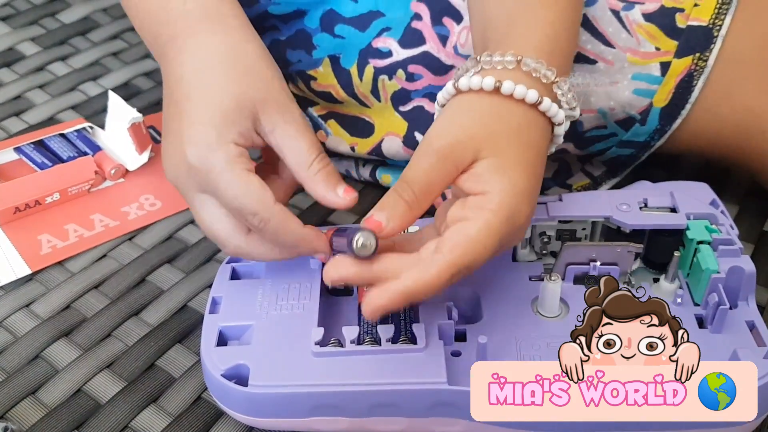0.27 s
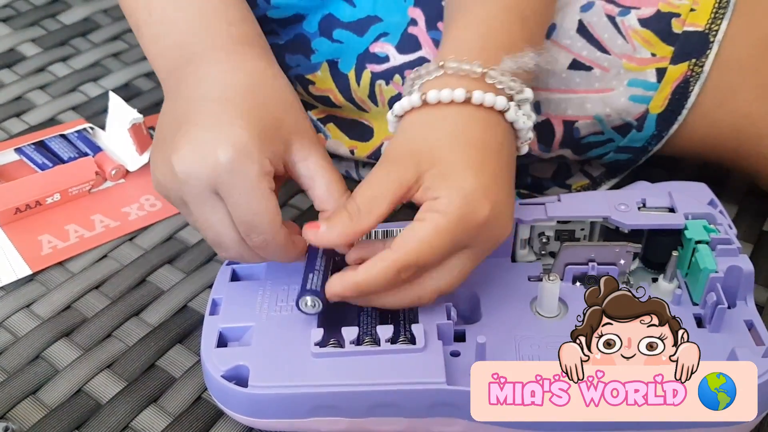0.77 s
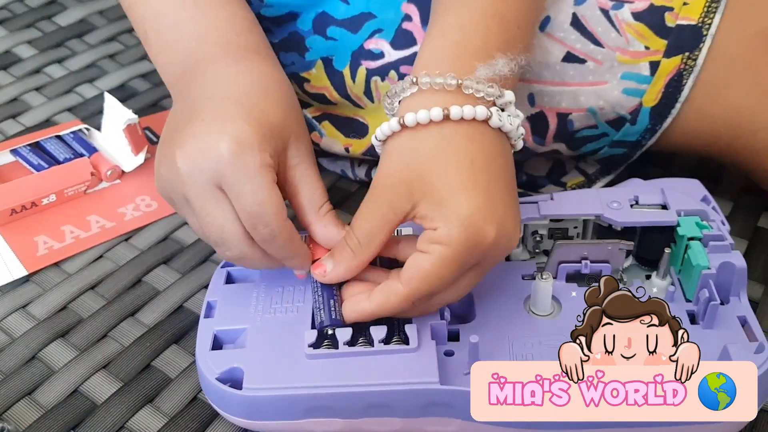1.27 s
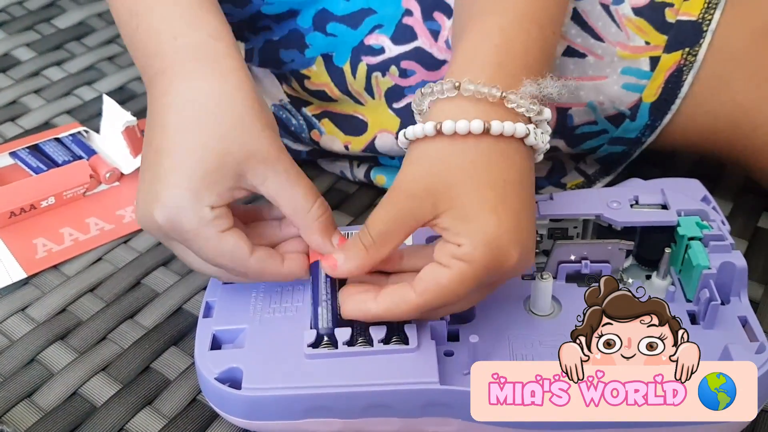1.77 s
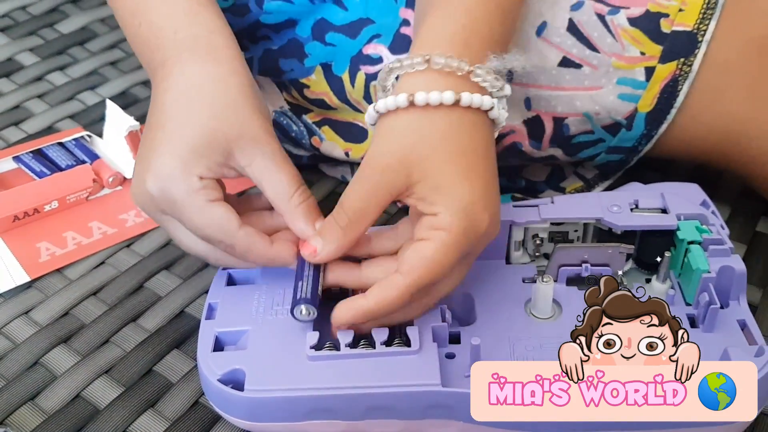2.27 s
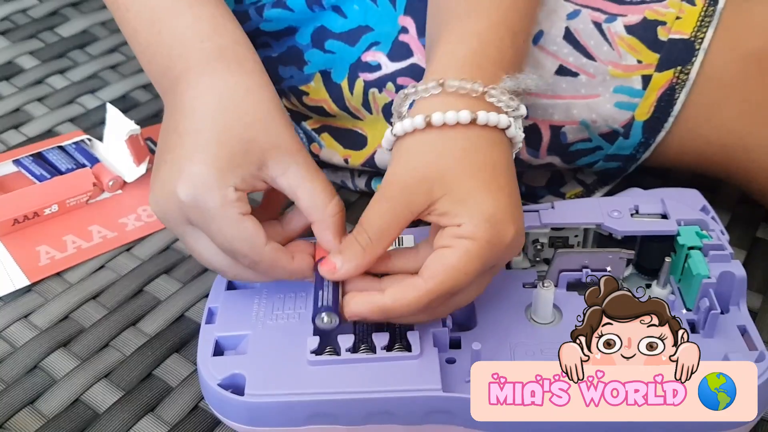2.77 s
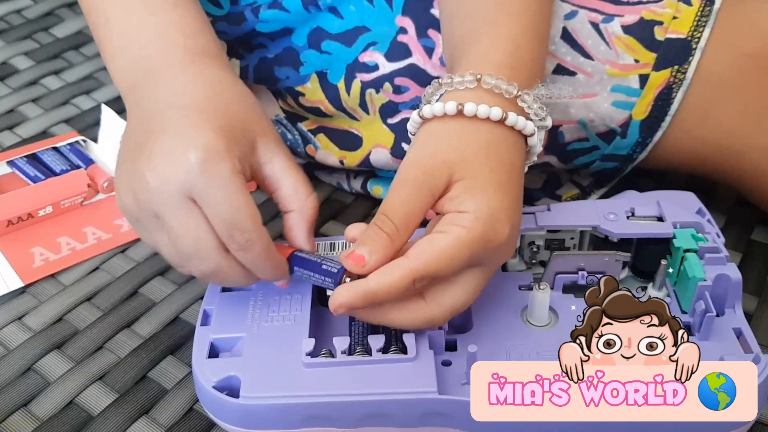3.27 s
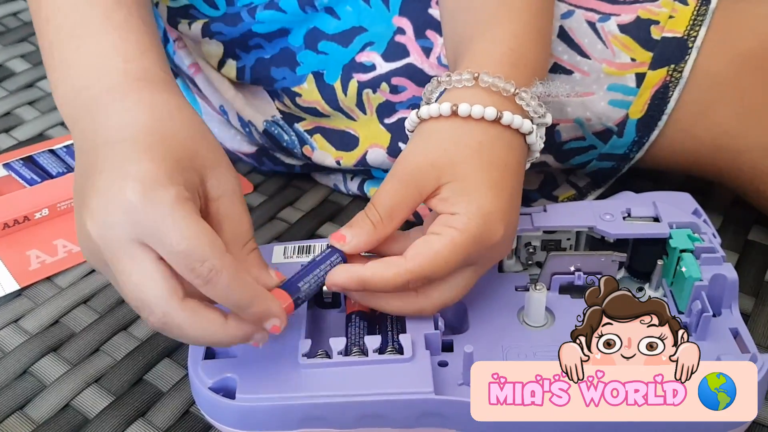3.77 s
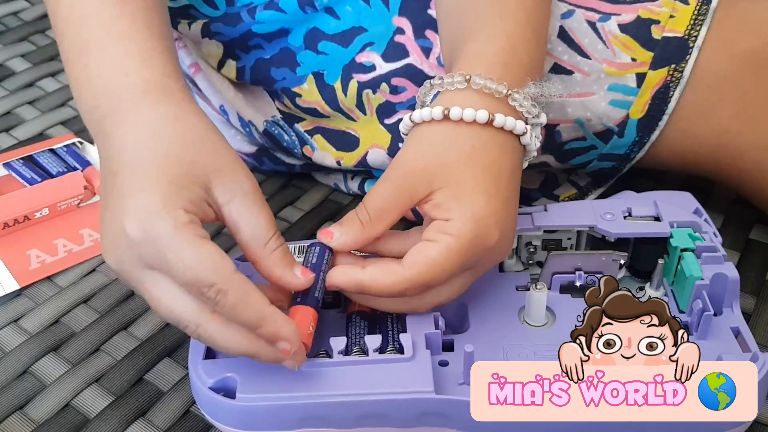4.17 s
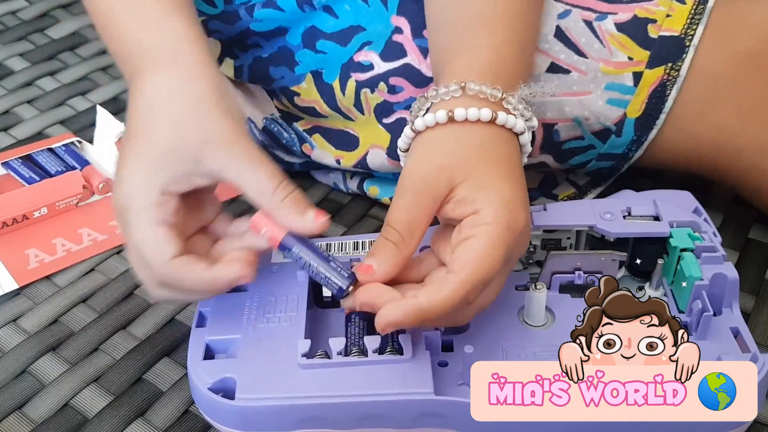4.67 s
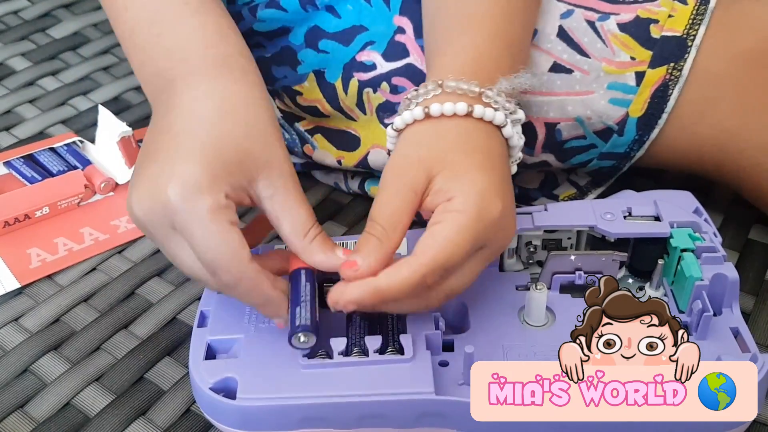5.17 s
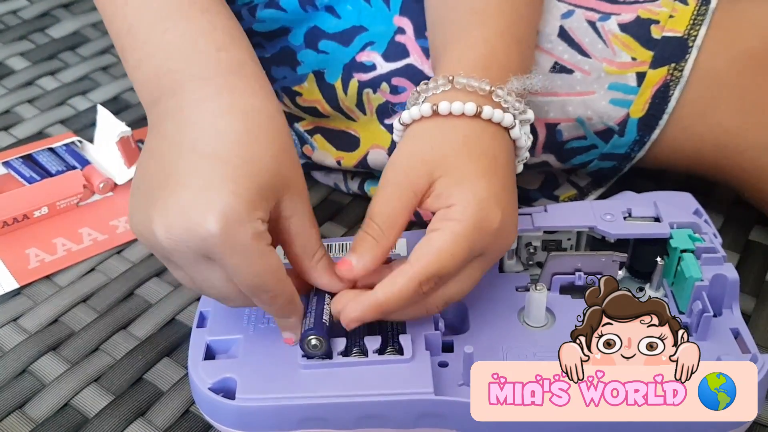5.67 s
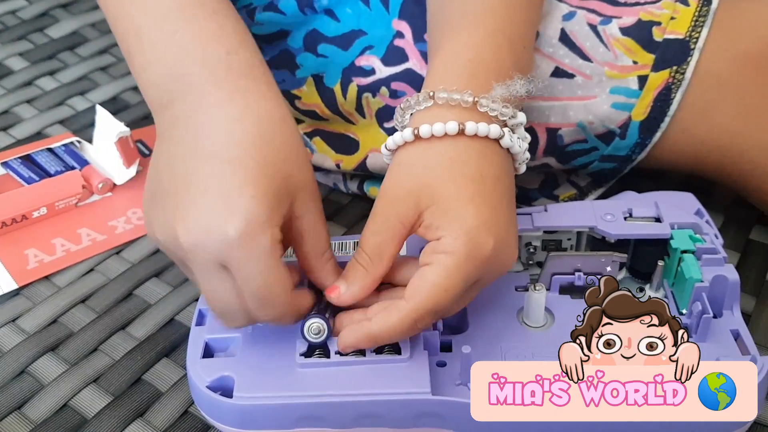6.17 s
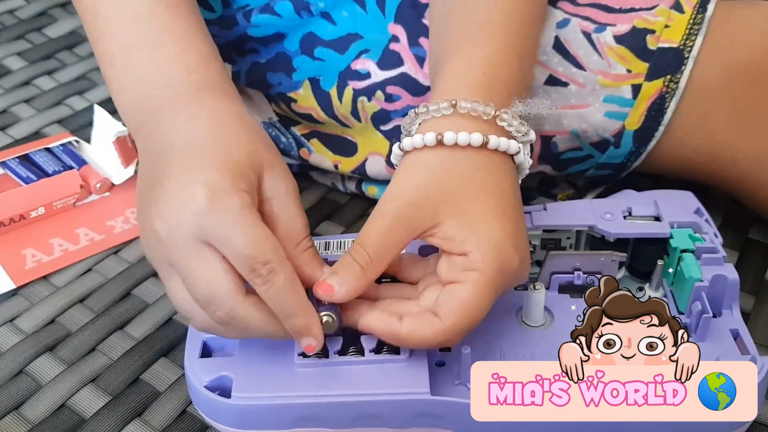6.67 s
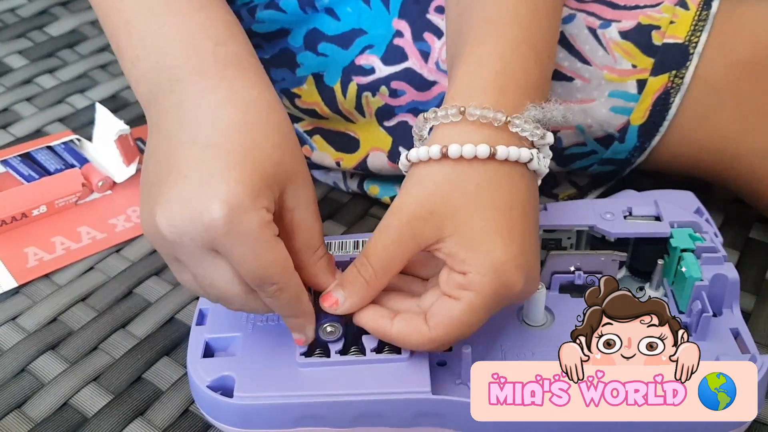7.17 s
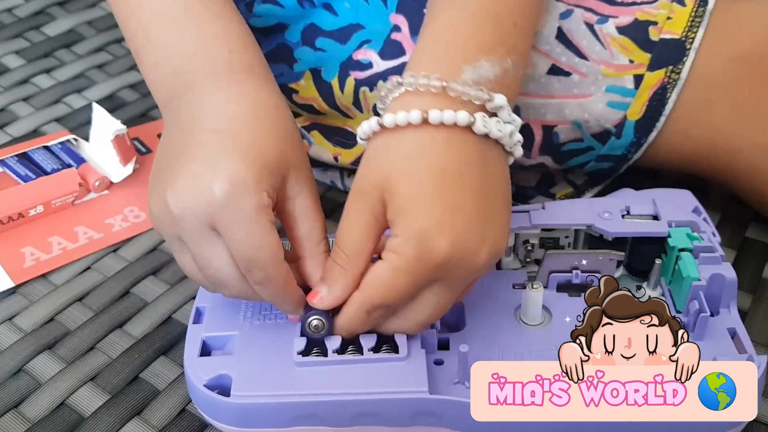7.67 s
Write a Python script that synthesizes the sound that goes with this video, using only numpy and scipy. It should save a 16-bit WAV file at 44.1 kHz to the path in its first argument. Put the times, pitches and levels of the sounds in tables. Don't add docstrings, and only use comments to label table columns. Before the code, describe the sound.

Close up, fingers work a small battery into the spring-loaded bay of a hollow plastic toy. Faint rubs and a tiny squeak come first, then a hard snap and a louder cluster of snaps. After a near-quiet gap, knocks resume, the battery slips loose in a rapid clatter and snaps home, followed by pressing clicks. Low distant rumble and slight hiss lie beneath, with a short room echo.

```python
import sys
import numpy as np
from scipy import signal
from scipy.io import wavfile
from scipy.ndimage import uniform_filter1d

SR = 44100
rng = np.random.default_rng(int(sys.argv[2]) if len(sys.argv) > 2 else 0)


def master(y):
    cut = np.clip(np.atleast_2d(y).T, -1, 1)
    pcm = np.round(cut * 32767)
    wavfile.write(sys.argv[1], SR, pcm.astype(np.int16))


def convert_level_to_amplitude(level_db):
    exponent = np.asarray(level_db, float) / 20
    return 10 ** exponent


N = 349708

# f/Hz, left level/dB, right level/dB, t60/ms
HOLLOW_MODES = [(310, -17, -16, 55), (515, -9.5, -13, 31), (730, -6, -6, 26), (895, 0, -1.5, 18),
                (1130, -4, -8, 20)]
PANEL_MODES = [(1250, -8, -20, 8), (1560, -5, -14, 15), (1830, -1, -14, 12), (2200, -5, -6, 8),
               (2420, -8, -14, 9), (2780, -3, -18, 11), (3200, -8, -15, 6)]
EDGE_MODES = [(3520, 2, -12, 4.4), (4760, -3.5, -14.5, 7.7), (5140, -3.5, -14.5, 9.3),
              (5560, -15, -14.5, 5.7), (7370, -28.5, -7, 3.4)]
TICK_MODES = [(8280, -12, -8.5, 4), (10040, -4, -5, 4), (10960, 0, -0.5, 4.5), (11900, -1, 2, 4),
              (13100, -3, -3, 3), (14500, -5, -6, 2.5)]
# low f/Hz, high f/Hz
RADIATED_BANDS = [(250, 1350), (1050, 3600), (3000, 7800), (7400, 16000)]


def rms_one(x):
    return x / np.sqrt(np.mean(x ** 2) + 1e-20)


def in_time(rows):
    s, *columns = np.transpose(rows)
    return [np.interp(np.arange(N) / SR, s, c) for c in columns]


def at_hz(points, hz):
    point_hz, value = np.array(points).T
    return np.interp(np.log(hz), np.log(point_hz), value)


def left_right(left, right):
    return np.array([[left], [right]])


def band_pass(x, order, band):
    return signal.sosfilt(signal.butter(order, band, "band", fs=SR, output="sos"), x)


def drift(rate):
    pole = np.exp(-80 * np.pi * rate / SR)
    white = rng.standard_normal(N // 40 + 2002)
    slow = signal.lfilter([1], [1, -2 * pole, pole * pole], white)[2000:]
    return np.interp(np.arange(N) / 40, np.arange(len(slow)), rms_one(slow))


def ring(force, hz, t60_ms):
    r = convert_level_to_amplitude(-60000 / (max(t60_ms, 1) * SR))
    w = 2 * np.pi * hz / SR
    return signal.lfilter([0, np.sin(w)], [1, -2 * r * np.cos(w), r * r], force + 1e-18)


def whistle(noise, hz, width_hz):
    t60_ms = 2200 / max(width_hz, .5)
    return rms_one(ring(ring(noise, hz, t60_ms), hz, t60_ms))


def pair(hz, noise):
    # f/Hz, likeness from -1 to 1
    likeness = [(60, 0.91), (180, 0.99), (550, 0.18), (1650, 0.18), (4970, 0.1), (15000, -0.18)]
    alike = np.clip(at_hz(likeness, hz), -1, 1)
    shared = np.sqrt(1 + alike) * noise[0]
    opposed = np.sqrt(1 - alike) * noise[1] * left_right(1, -1)
    return (shared + opposed) / np.sqrt(2)


def banded_noise(spectrum, low_hz, octaves, patchy_db):
    # f/Hz, left-right level/dB
    lean = [(60, -0.5), (180, -1), (550, 0.5), (1650, -1), (4970, 1.5), (15000, 1)]
    out = 0
    edges = np.minimum(low_hz * 2 ** np.arange(0, octaves, 1 / 3), .45 * SR)
    white = rng.standard_normal((2, 2, N))
    for k, (low, high) in enumerate(zip(edges, edges[1:])):
        hz = np.sqrt(low * high)
        band = pair(hz, band_pass(white[k % 2], 2, [low, high]))
        lean_db = at_hz(lean, hz) / 2 * left_right(1, -1)
        out = out + convert_level_to_amplitude(at_hz(spectrum, hz) + lean_db) * convert_level_to_amplitude(patchy_db * drift(5.6)) * band
    return rms_one(out)


def background():
    # t/s, level/dB
    deep_load = [(0.0, -61), (0.02, -55), (0.84, -61), (1.48, -50.5), (1.57, -63.5), (1.81, -53),
                 (2.05, -68), (2.07, -55.5), (2.65, -53), (3.86, -63), (4.09, -54.5), (6.8, -53.5),
                 (6.89, -51.5), (7.18, -52.5), (7.64, -49), (7.71, -72), (7.8, -44.5), (7.93, -58.5)]
    # t/s, level/dB
    motor_load = [(0.0, -65.5), (0.09, -56), (0.79, -59), (1.02, -63.5), (1.52, -56), (1.57, -61),
                  (6.03, -61), (6.05, -52), (6.82, -66), (7.46, -54), (7.51, -71), (7.93, -69.5)]
    # f/Hz, density level/dB
    deep_spectrum = [(13, -42), (22, -20), (31, -15.5), (43, 6), (75, -1.5), (85, -9.5), (110, -33),
                     (190, -120)]
    # f/Hz, density level/dB
    air_spectrum = [(71, -30), (120, 2.5), (153, -13), (200, -8.5), (341, -11.5), (535, -26.5), (874, -31),
                    (949, -32.5), (3450, -39), (4980, -34), (8480, -51.5), (9990, -43), (12000, -28),
                    (15000, -28.5), (16000, -53.5)]
    # f/Hz, level/dB, left-right level/dB, wobble/dB
    hum_lines = [(98.75, -64, 4.5, 4.5), (152.7, -78.5, -8.4, 3.5), (202, -67.5, -7.5, 1),
                 (265, -78, -1.5, 0), (332, -73.5, 2, -1), (464, -85, -9, 3.5), (712, -94.5, 2, 5.5),
                 (869, -91, 14, 2)]
    # f/Hz, width/Hz, level/dB, left-right level/dB
    port_peaks = [(2440, 1100, -83, 7.5), (4910, 500, -89, 7.5)]
    (deep_db,), (upper_db,) = in_time(deep_load), in_time(motor_load)
    out = convert_level_to_amplitude(deep_db) * banded_noise(deep_spectrum, low_hz=22.7, octaves=2.1, patchy_db=3.0)
    upper = band_pass(rng.standard_normal((2, N)), 2, [82, 132])
    out += convert_level_to_amplitude(upper_db - 4.5) * rms_one(pair(100, upper))
    out += convert_level_to_amplitude(-61 - 3.5) * banded_noise(air_spectrum, low_hz=123.85, octaves=7.4, patchy_db=-1.04)
    for hz, level_db, lean_db, wobble_db in hum_lines:
        turn = 2 * np.pi * hz * np.arange(N) / SR + 0.26 * drift(0.51)
        swell_db = wobble_db * drift(7.9) + (upper_db - np.mean(upper_db)) * (hz < 120)
        out += convert_level_to_amplitude(level_db + 2.5 + swell_db + lean_db / 2 * left_right(1, -1)) * np.sin(turn)
    for hz, width_hz, level_db, lean_db in port_peaks:
        hiss = whistle(rng.standard_normal((2, N)), hz, width_hz)
        out += convert_level_to_amplitude(level_db + lean_db / 2 * left_right(1, -1)) * hiss
    return signal.sosfilt(signal.cheby2(12, 40, 15750, fs=SR, output="sos"), out)


def contacts():
    # t/s, peak level/dB, hollow thud level/dB, bright edge level/dB
    knocks = [(0.473, -32.5, -15.5, -17.5), (1.803, -32, -17, -17.5), (2.129, -46, -13, -11),
              (5.082, -49, -30, -7), (5.09, -47, -18, -29), (5.12, -32.5, -36, -20), (5.132, -42, -35, -16),
              (5.183, -39.5, -23, -17), (5.323, -34.5, -9.5, -18), (5.45, -47.5, -25, -16),
              (5.831, -46, -13.5, -17), (6.357, -46, -24, -13.5), (6.378, -43.5, -34, -20),
              (6.433, -50.5, -28, -13), (6.891, -54, -3, -11), (7.339, -33, -14, -32),
              (7.262, -38.5, -22, -11), (7.317, -44.5, -27, -13), (7.335, -23, -31, -15.5),
              (7.386, -27.5, -29, -16), (7.752, -32.5, -10, -16.5), (7.92, -31.5, -14, -16.5)]
    # t/s, peak level/dB, thud level/dB, edge level/dB
    snaps = [
        (1.382, -16, -23, -18),
        (2.329, -9.5, -37, -18),
        (2.345, -14, -25, -22),
        (2.391, -22.5, -14.5, -17.5),
        (2.477, -23, -22, -24.5),
        (5.068, -33.5, -41, -16),
        (5.533, -31.5, -53, -33.5),
        (5.9, -13, -17, -18.5),
        (6.216, -15.5, -29.5, -38),
    ]
    # t/s, peak level/dB, thud level/dB, edge level/dB, chatter/ms
    clatter = [(5.869, -34.5, -9.5, -18, 4.25), (5.925, -20.5, -22, -23, 3.2), (5.94, -26, -20, -28, 3.2),
               (5.946, -13.5, -45.5, -20, 3), (5.953, -26.5, -18, -18, 4.5), (5.956, -23, -45, -14.5, 2.8),
               (5.972, -34.5, -42, -3.5, 3.5), (5.977, -21.5, -30, -18.5, 2.7),
               (5.986, -18.5, -22, -20, 3.2), (6, -29, -4.5, -24, 3), (6.006, -30.5, -14, -37.5, 4),
               (6.014, -38.5, -2, -14, 4), (6.026, -40, -5.5, -2.5, 3.1), (6.039, -33, -17.5, -21, 3.5),
               (6.058, -40.5, -4, -2.5, 3.3), (6.197, -37.5, -25, -8.5, 8.9), (6.209, -33.5, -31, 1.5, 2.6),
               (6.231, -33.5, -9.5, -12, 2.25)]
    # t/s, peak level/dB, edge level/dB, metal tick level/dB
    metal_contacts = [(1.049, -62, 7, -34.5), (1.403, -36, -3, -15.5), (1.657, -53.5, -4, -15),
                      (1.723, -45.5, 3.5, -18.5), (1.744, -44.5, 5.5, -14), (1.912, -60.5, 1.5, -24),
                      (2.034, -55.5, 1.5, -20), (2.092, -46, 3, -15), (2.159, -52, -2, -23),
                      (6.094, -29.5, 3, -13.5), (6.243, -36.5, -2, -14.5), (7.688, -72.5, 20.5, -8)]
    # t/s, peak level/dB, hollow thud level/dB
    taps = [(0.169, -56.5, -9), (0.934, -71, 1), (1.018, -57.5, -12), (1.246, -71, -7), (2.761, -60.5, -20),
            (3.057, -67.5, 11.5), (3.358, -56, -16), (5.25, -64, -18), (5.747, -57.5, -8.5),
            (5.8, -53.5, -19.5), (6.419, -58.5, -13), (6.711, -62, -7.5), (7.124, -57, -25)]
    rows = [(s, peak, thud, edge, -33, 4.5) for s, peak, thud, edge in knocks]
    rows += [(s, peak, thud, edge, -37, 2.98) for s, peak, thud, edge in snaps]
    rows += [(s, peak, thud, edge, -28, ms) for s, peak, thud, edge, ms in clatter]
    rows += [(s, peak, -24, edge, tick, 2.9) for s, peak, edge, tick in metal_contacts]
    rows += [(s, peak, thud, -7.5, -45.5, 3.77) for s, peak, thud in taps]
    s, peak_db, thud_db, edge_db, tick_db, chatter_ms = np.transpose(sorted(rows))
    tick_db = tick_db + 0.48 * (edge_db + 12)
    return s, peak_db, thud_db, edge_db, tick_db, chatter_ms


def grip(s):
    # t/s, f/Hz, level/dB re the blow's peak
    grips = [(0.17, 1910, 8), (0.473, 2090, 3.5), (1.019, 2280, 10), (1.382, 1600, 3), (1.723, 2800, 4),
             (1.803, 970, -9), (2.129, 1700, -2), (2.329, 1810, -4.5), (2.345, 1810, -5),
             (2.391, 2300, 4.5), (2.477, 2040, -0.5), (2.761, 1650, 8.5), (5.02, 2690, 0),
             (5.068, 1570, -2), (5.12, 2630, 0), (5.132, 1130, 7), (5.184, 1690, 4.5), (5.324, 1860, -2),
             (5.533, 1564, -3.5), (5.8, 1110, 0.5), (5.87, 1035, 1), (5.9, 1554, 5.5), (5.925, 1560, 0.5),
             (5.941, 1590, -1.5), (5.945, 1560, -0.5), (5.957, 1597, 6), (5.976, 1560, 2.5),
             (5.987, 1560, 3.5), (6.0, 1510, 3), (6.006, 1520, -2), (6.041, 1170, 5.5), (6.216, 1760, -3.5),
             (6.232, 1120, 5), (6.378, 2230, 2.5), (6.892, 1108, -9), (7.263, 2050, 5.5),
             (7.318, 2190, 3.5), (7.335, 1610, 3.5), (7.339, 1260, 3.5), (7.387, 2570, 4.5),
             (7.753, 947, -2), (7.92, 2030, 7)]
    at, hz, note_db = np.transpose(grips)
    nearest = np.abs(s[:, None] - at).argmin(axis=1)
    held = np.abs(s - at[nearest]) < .007
    return hz[nearest], np.where(held, note_db[nearest], -40), held


def impact_force(age, chatter_ms):
    length_ms = np.clip(chatter_ms, 1.2, 20)
    luck = rng.random((len(chatter_ms), 3, len(age)))
    struck = luck[:, 0] < 4000 / SR
    bounce = struck * -np.log(1 - luck[:, 1]) * np.sign(luck[:, 2] - .5)
    spent = 1000 * age / length_ms[:, None]
    force = .3 * bounce * np.sqrt(spent) * np.exp(-spent)
    force[:, 0] = (2.7 / length_ms) ** 3
    return force


def clicks():
    # f/Hz, left level/dB, right level/dB, t60/ms
    cracks = [
        [],
        [(2500, 11, -3, 2.2)],
        [(4600, 8, 1, 1.6)],
        [(12000, 6, 5, 1.2)],
    ]
    s, peak_db, thud_db, edge_db, tick_db, chatter_ms = contacts()
    age = np.arange(1536) / SR
    force = impact_force(age, chatter_ms)
    spot = rng.standard_normal((len(s), 4, 8, 3))
    note_hz, note_db, held = grip(s)
    turn = 2 * np.pi * note_hz[:, None] * age
    note = np.array([np.sin(turn), convert_level_to_amplitude(-14.5) * np.cos(turn)]) * convert_level_to_amplitude(-60000 * age / 14)
    note = signal.fftconvolve(note, force[None], axes=2)
    blows = note * (convert_level_to_amplitude(peak_db - 5 + note_db) / np.abs(note[0]).max(axis=1))[:, None]
    families = [HOLLOW_MODES, PANEL_MODES, EDGE_MODES, TICK_MODES]
    levels_db = [thud_db + 8.0, 0 * s - 1.5, edge_db + 6.5, tick_db + 10.5]
    for p, (modes, part_db, band) in enumerate(zip(families, levels_db, RADIATED_BANDS)):
        body = 0
        for k, (hz, left_db, right_db, t60_ms) in enumerate(modes + cracks[p]):
            detune = 1 + .02 * spot[:, p, k, :1]
            turn = 2 * np.pi * hz * detune * age
            level_db = left_right(left_db, right_db) + 2.5 * spot[:, p, k, 1:].T
            if p == 0:
                level_db = level_db + 0.28 * (thud_db + 13) * np.log2(800 / hz)
            if p == 1:
                level_db = level_db - 6 * np.abs(np.log2(hz / note_hz)) * held
            far_phase = np.pi * k + (hz > 450) * (1 + k)
            phase = np.array([[[np.pi * k]], [[far_phase]]])
            body = body + convert_level_to_amplitude(level_db[:, :, None] - 60000 * age / t60_ms) * np.sin(turn + phase)
        heard = band_pass(signal.fftconvolve(body, force[None], axes=2), 3, band)
        blows = blows + heard * (convert_level_to_amplitude(peak_db + part_db) / np.abs(heard[0]).max(axis=1))[:, None]
    at = np.round(s * SR).astype(int)
    out = np.zeros((2, N + blows.shape[2]))
    for start, blow in zip(at, blows.transpose(1, 0, 2)):
        out[:, start:start + blow.shape[1]] += blow
    return out[:, :N]


def room(x):
    # band's low f/Hz, left level/dB, right level/dB, t60/s
    echo_bands = [(210, -43, -37, 0.3), (707.5, -37.5, -44, 0.49), (1238, -43.5, -45.5, 0.36),
                  (2050, -45, -50.5, 0.49), (2830, -44, -51, 0.33), (5800, -44.5, -39, 0.5),
                  (9070, -47, -45.5, 0.38)]
    age = np.arange(SR // 2) / SR
    white = rng.standard_normal((2, 2, len(age)))
    edges = [row[0] for row in echo_bands] + [16000]
    echo = 0
    for k, (low_hz, left_db, right_db, t60) in enumerate(echo_bands):
        noise = white[k % 2] if k else white[0, :1]
        band = band_pass(noise, 2, [low_hz, edges[k + 1]])
        walls = convert_level_to_amplitude(-60 * age / min(t60, .44))
        scatter = convert_level_to_amplitude(14 - 60 * age / 0.035)
        echo = echo + convert_level_to_amplitude(left_right(left_db, right_db)) * (walls + scatter) * band
    arrival = np.clip(age / 0.006 - .3, 0, 1)
    return signal.fftconvolve(x[None], echo * arrival, axes=1)[:, :N]


def pressure():
    # start t/s, hardest t/s, end t/s, level/dB, bright edge level/dB
    strokes = [(0.326, 0.43, 0.61, -67, 2.5), (0.984, 1.06, 1.06, -61.5, -7.5),
               (1.66, 1.753, 1.87, -63.5, 4.5), (2.073, 2.138, 2.24, -59.5, -0.5),
               (2.245, 2.272, 2.56, -64, 4), (2.732, 2.751, 3.04, -74.5, -3),
               (3.332, 3.407, 3.54, -76, 1.5), (4.986, 5.023, 5.15, -60.5, -4),
               (5.106, 5.11, 5.16, -45.5, -13.5), (5.183, 5.197, 5.86, -66.5, -9),
               (5.328, 5.342, 5.5, -67.5, -7), (5.898, 5.935, 6.22, -43.5, -6), (6.185, 6.19, 5.5, -50, -9),
               (6.195, 6.239, 6.27, -35, -12.5), (6.357, 6.517, 6.78, -65.5, -2),
               (6.773, 6.786, 6.89, -68.5, 2), (7.167, 7.22, 7.33, -50.5, -7),
               (7.342, 7.373, 7.45, -49.5, -6), (7.586, 7.624, 7.87, -74, 6.5),
               (7.719, 7.752, 7.79, -57, 2.5)]
    rise_db, fall_db, curve = 16, 24.5, 1.18
    level, bright = np.full(N, 1e-12), np.zeros(N)
    for start, hardest, end, level_db, edge_db in strokes:
        span = np.arange(round(start * SR), round(end * SR))
        away = np.interp(span / SR, [start, hardest, end], [1, 0, 1]) ** curve
        stroke = convert_level_to_amplitude(level_db - away * np.where(span / SR < hardest, rise_db, fall_db))
        level[span] += stroke
        bright[span] += stroke * convert_level_to_amplitude(edge_db)
    return level, bright / level


def rubs():
    level, edge = pressure()
    sizes = convert_level_to_amplitude(5.0 * np.minimum(rng.exponential(1, (2, N)), 5)) * rng.choice([-1, 1], (2, N))
    caught = rng.random((2, N)) < 4000 * convert_level_to_amplitude(4 * drift(40)) / SR
    catches = level * rms_one(sizes * caught)
    force = np.array([catches[0], 0.73 * catches[0] + 0.35 * catches[1]])
    parts = [(HOLLOW_MODES[1:], convert_level_to_amplitude(-24), (400, 1350)),
             (PANEL_MODES, convert_level_to_amplitude(-10.5), RADIATED_BANDS[1]),
             (EDGE_MODES, edge * convert_level_to_amplitude(-7.0), RADIATED_BANDS[2]),
             (TICK_MODES, edge * convert_level_to_amplitude(-22.5), RADIATED_BANDS[3])]
    out = 0
    for modes, gain, band in parts:
        part = 0
        for k, (hz, left_db, right_db, t60_ms) in enumerate(modes):
            mode = ring(force, hz, .55 * t60_ms) * (-1) ** k
            part = part + convert_level_to_amplitude(left_right(left_db, right_db)) * mode
        out = out + gain * band_pass(part, 2, band)
    return out


def squeaks():
    # t/s, length/s, from f/Hz, to f/Hz, level/dB
    glides = [(.333, .034, 3500, 3650, -58), (.385, .03, 3650, 3550, -57), (.41, .06, 3650, 3600, -65),
              (.40, .06, 3250, 2850, -66), (.345, .03, 4500, 4420, -64), (.39, .075, 4550, 4620, -60),
              (.342, .03, 6700, 6620, -61), (.388, .035, 6950, 6550, -64), (7.19, .07, 2620, 2550, -62),
              (.375, .1, 2250, 2180, -61), (.41, .06, 1720, 1720, -68), (.42, .06, 1110, 1110, -64),
              (3.355, .085, 2300, 2560, -75), (3.355, .08, 4050, 4000, -76), (3.355, .06, 4850, 4830, -79),
              (3.38, .06, 1100, 1100, -80), (7.192, .065, 2150, 2120, -55), (1.708, .025, 1550, 1550, -60),
              (7.195, .05, 1150, 1120, -64), (5.012, .035, 2500, 2650, -62), (5.015, .03, 4900, 4850, -66),
              (.33, .14, 5000, 3300, -68), (.8, .38, 518, 522, -75), (1.9, .25, 552, 556, -80),
              (1.75, 1.7, 151, 151, -64)]
    out = np.zeros(N)
    for start, length, from_hz, to_hz, level_db in glides:
        count = round(length * SR)
        rough = from_hz > 900
        shake = uniform_filter1d(rng.standard_normal((2, 2 ** 17)), size=90)[:, :count] * np.sqrt(90)
        pitch = np.linspace(from_hz, to_hz, count) * (1 + .011 * shake[0] * rough)
        swell = np.hanning(count) ** .5 * convert_level_to_amplitude(level_db - 2.0 + 4.3 * shake[1] * rough)
        out[round(start * SR):][:count] += swell * np.sin(2 * np.pi * np.cumsum(pitch) / SR)
    return out * convert_level_to_amplitude(left_right(3, -4))


def lingering():
    # t/s, f/Hz, level/dB, t60/ms
    free_rings = [(0.477, 1110, -58, 140), (1.384, 915, -54, 280), (1.386, 1575, -46, 480),
                  (1.386, 1530, -54, 300), (1.807, 908, -56, 200), (6.893, 1130, -56, 50),
                  (7.755, 888, -51, 350), (7.755, 1523, -60, 250)]
    out = np.zeros(N)
    for start, hz, level_db, t60_ms in free_rings:
        knock = np.zeros(N)
        knock[round(start * SR):][:32] = np.hanning(32) / 16
        out += convert_level_to_amplitude(level_db + 2.5 * drift(50)) * ring(knock, hz, t60_ms)
    return out * convert_level_to_amplitude(left_right(2.5, -2.5))


def scene():
    near = clicks() + rubs() + squeaks()
    return near + lingering() + room(near[0]) + background()


def top_cut(x):
    return signal.sosfilt(signal.butter(12, 16520, fs=SR, output="sos"), x)


def record(dry):
    return top_cut(dry)


dry = scene()
out = record(dry)
master(out)
```